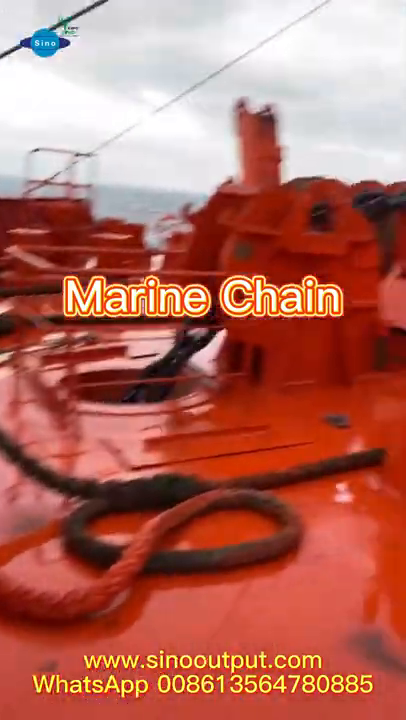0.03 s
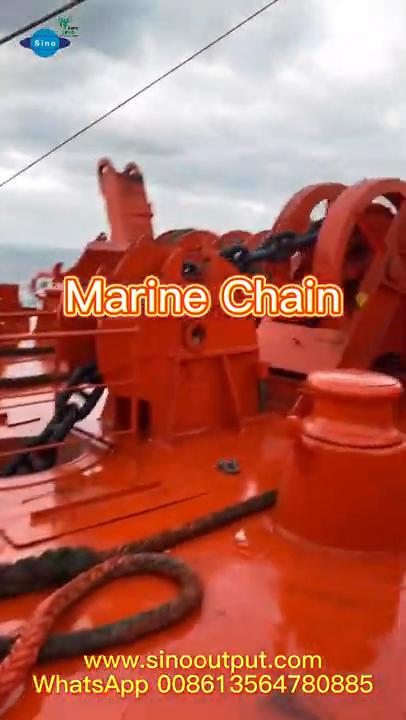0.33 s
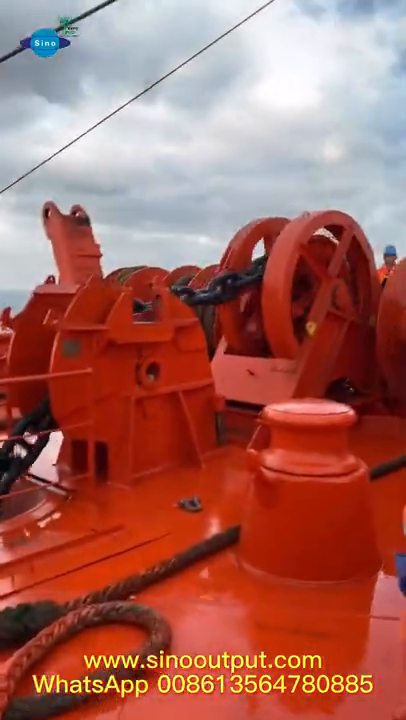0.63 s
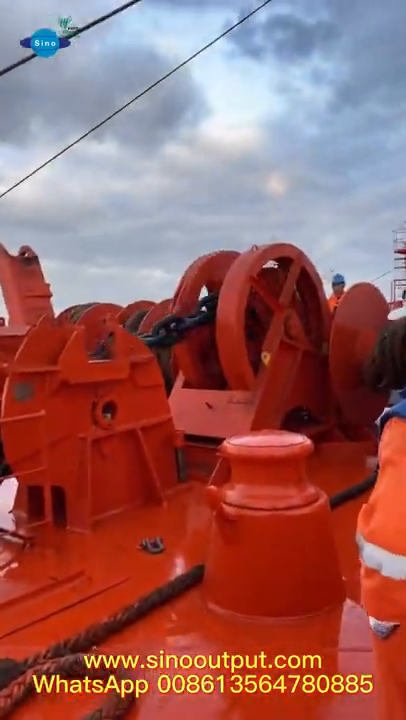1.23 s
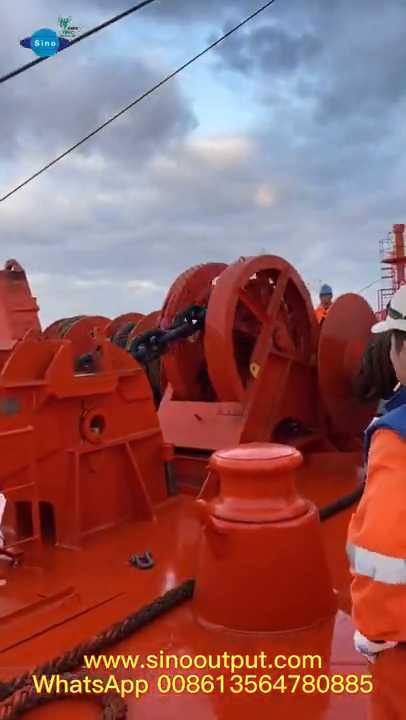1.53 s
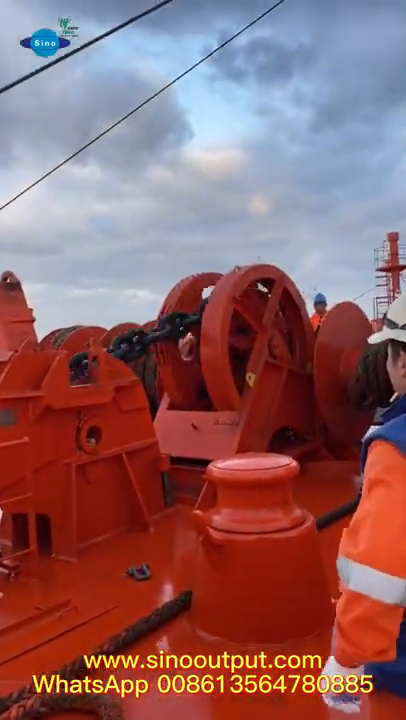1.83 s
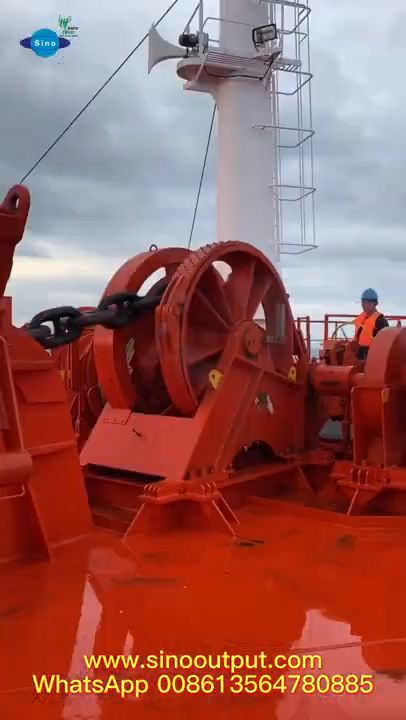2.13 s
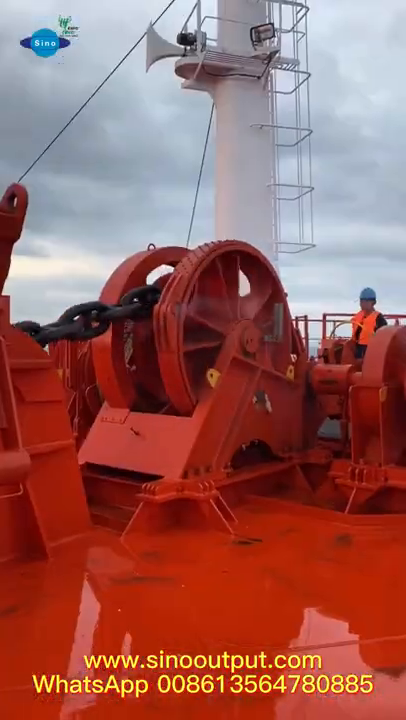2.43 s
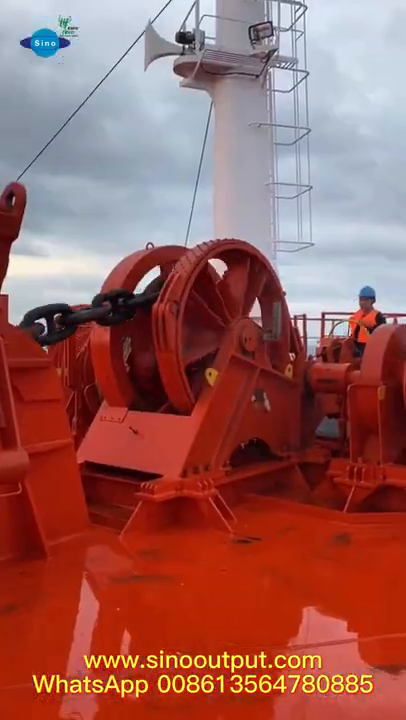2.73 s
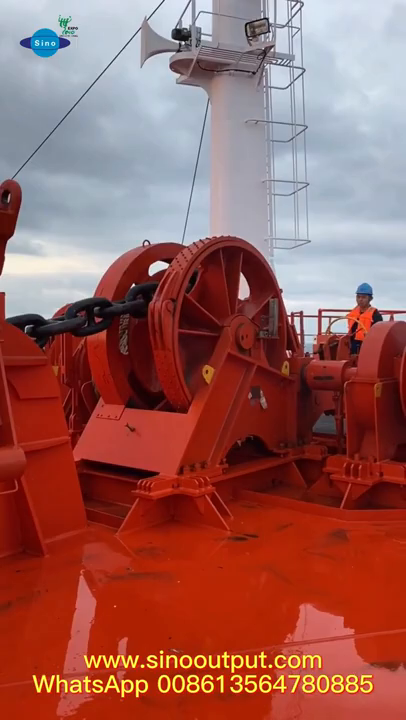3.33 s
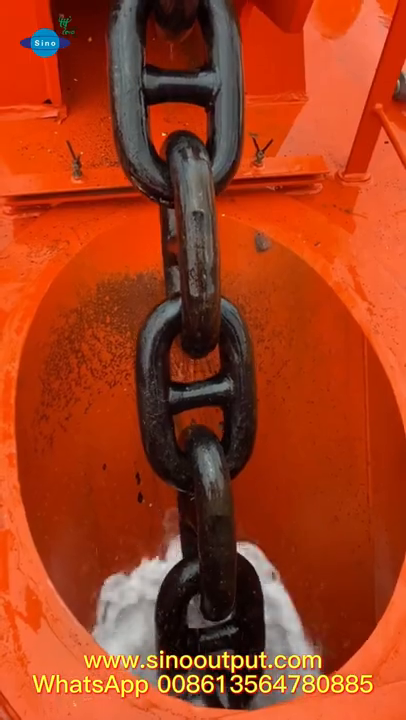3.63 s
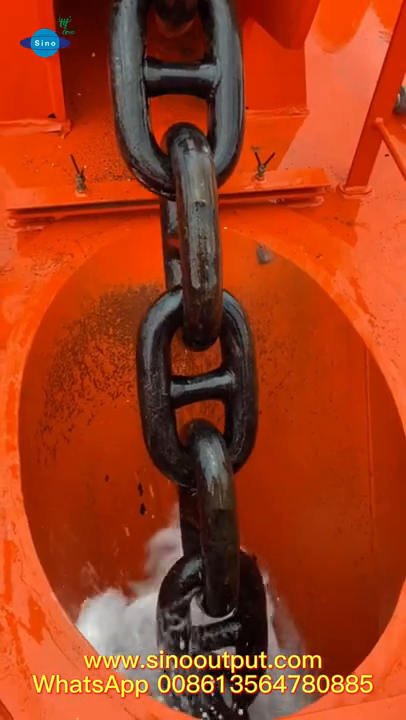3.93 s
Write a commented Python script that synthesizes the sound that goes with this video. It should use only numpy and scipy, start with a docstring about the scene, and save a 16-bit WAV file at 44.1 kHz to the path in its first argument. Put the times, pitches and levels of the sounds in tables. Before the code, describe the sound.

A heavy anchor chain clatters over a winch and slows, then water roars in a pipe.

```python
"""Anchor chain over a windlass

A stereo microphone at three places on a ship's deck, joined by short fades. Beside the chain, links
slam over the wheel about four times a second amid dense clatter and a booming steel deck. Facing the
wheel, the chain slows, wet links scrape and the slipping brake sings faintly. Over the hawse pipe,
wash water roars, sprays and splashes inside."""
import sys
import numpy as np
from scipy import signal
from scipy.fft import rfft, irfft, next_fast_len
from scipy.io import wavfile
from scipy.ndimage import map_coordinates

SR = 44100
rng = np.random.default_rng(int(sys.argv[2]) if len(sys.argv) > 2 else 0)


def store_wav(level_fs):
    """Save 16-bit WAV to argv[1]."""
    pcm = np.round(np.clip(np.atleast_2d(level_fs), -1, 1) * 32767)
    wavfile.write(sys.argv[1], SR, pcm.T.astype(np.int16))


N = 176400
T = np.arange(N) / SR

# the fast chain's clatter and the deck's boom (t/s, level/dB)
CLATTER_LEVELS = [(0, -17.5), (.12, -21.5), (.21, -19.5), (.29, -21), (.34, -18), (.44, -18.5), (.54, -23),
                  (.6, -17), (.65, -23.5), (.75, -20.5), (.81, -21), (.88, -17), (1.01, -19), (1.08, -22),
                  (1.16, -23.5), (1.27, -19), (1.33, -22), (1.37, -17.5), (1.44, -21), (1.53, -17.5),
                  (1.63, -20.5), (1.8, -21), (1.86, -23.5), (1.92, -20.5), (2.0, -21)]
BOOM_LEVELS = [(0, -19), (.3, -22.5), (.48, -19.5), (.62, -24), (.76, -18.5), (.86, -25), (1.02, -18),
               (1.14, -25.5), (1.3, -18.5), (1.38, -23), (1.56, -20.5), (1.66, -20), (1.8, -20), (2.0, -20)]
# links landing on the wheel (t/s, deck thud level/dB, thud f/Hz, clash level/dB)
LANDINGS = [(0.148, -7.5, 78, -20.5), (0.393, -12, 95, -17), (.682, -6.5, 91, -14), (0.96, -7.5, 87, -15.5),
            (1.224, -11, 100, -13.5), (1.478, -5, 101, -14), (1.726, -11, 90, -13), (1.987, -7, 98, -15.5),
            (2.333, -8.5, 120, -18.5), (2.794, -14, 291, -33)]
# links clanking together (t/s, level/dB, brightest f/Hz)
CLANKS = [(0.194, -33.5, 3130), (.322, -38, 3600), (0.394, -30, 1810), (.445, -42, 2300), (.495, -38, 2100),
          (0.756, -31.5, 1900), (.865, -44, 1900), (.965, -31, 1650), (1.228, -29.5, 2000),
          (1.374, -32.5, 2010), (1.535, -30.5, 2560), (1.724, -33, 2100), (2.229, -39.5, 2360),
          (2.326, -35.5, 1650), (2.405, -46, 2730), (2.535, -40, 2770), (2.77, -46, 2300),
          (3.044, -43, 2400)]
# wet links scraping, and link edges ticking (t/s, level/dB)
SCRAPES = [(.21, -41.5), (.38, -44), (.97, -42.5), (1.22, -41.5), (1.535, -50), (1.71, -53), (1.985, -43),
           (2.225, -54), (2.47, -43), (2.64, -46.5), (2.785, -53), (3.05, -56)]
TICKS = [(.375, -47), (.659, -45), (1.184, -54), (1.432, -43.5), (1.460, -49), (1.690, -39), (1.718, -39),
         (2.061, -39.5), (2.083, -51.5), (2.218, -49), (2.463, -38)]
# the chain slowing (t/s, rumble level/dB, clatter level/dB)
SLOWING_LEVELS = [(2.09, -20.5, -27), (2.13, -18, -24), (2.19, -22, -30.5), (2.235, -20.5, -23),
                  (2.29, -19.5, -29), (2.37, -18.5, -23.5), (2.42, -23, -30), (2.495, -23, -33.5),
                  (2.55, -22.5, -24), (2.66, -23, -25.5), (2.72, -21, -23.5), (2.815, -18, -27),
                  (2.9, -23, -32.5), (3.04, -23, -27), (3.15, -24, -35.5), (3.22, -30, -37.5),
                  (3.28, -31, -40.5), (3.315, -22, -34), (3.37, -27.5, -40)]
# the brake band's slip (t/s, squeal level/dB, main partial f/Hz)
BRAKE_SLIP = [(2.42, -25, 1398), (2.51, 2, 1415), (2.6, -1.5, 1381), (2.69, 5, 1388), (2.78, 1, 1390),
              (2.86, 5, 1343), (2.96, -1.5, 1387), (3.05, -2, 1370), (3.16, 4, 1378), (3.27, -0.5, 1360),
              (3.38, -2, 1400)]
# splashing builds in the pipe (t/s, level/dB)
SPLASH_LEVELS = [(3.45, -27), (3.7, -27), (3.8, -27.5), (3.95, -24.5)]
# spectra of the noisy sources (f/Hz, relative level/dB)
CLATTER_SPECTRUM = [(60, -36), (170, -8.5), (370, 0.5), (600, -1), (950, -6), (1400, -13), (2200, -18.5),
                    (2750, -26), (4000, -34), (5200, -37), (6500, -41.5), (11000, -53), (16000, -80)]
DECK_SPECTRUM = [(20, -35), (40, -13), (65, -2.5), (100, 2), (150, -6.5), (210, -7), (400, -20.5),
                 (1000, -58)]
CLASH_SPECTRUM = [(50, -27), (150, 10.5), (400, 0.5), (850, 2), (1400, -1.5), (2200, -18), (3000, -22.5),
                  (4200, -32.5), (6000, -38), (15000, -80)]
SCRAPE_SPECTRUM = [(800, -30), (3000, -5), (5200, 1.5), (7000, -8), (10500, -9.5), (16000, -10)]
TICK_SPECTRUM = [(2000, -23), (5000, -2), (7200, -1.5), (10000, -7.5), (12500, -8), (15500, -5)]
SLOW_RUMBLE_SPECTRUM = [(20, -40), (40, -13), (65, -0.5), (95, -1), (140, 2.5), (200, -1), (300, -3),
                        (420, -4.5), (600, -11.5), (1500, -63)]
SLOW_CLATTER_SPECTRUM = [(200, -11), (520, -1), (800, 1), (1300, -9.5), (1800, -15), (2600, -22.5),
                         (3700, -35), (5300, -38.5), (6600, -43.5), (11000, -51), (16000, -65)]
WATER_SPECTRUM = [(20, -33), (45, -13), (70, 3.5), (130, 1), (230, -0.5), (360, -1.5), (700, -4),
                  (1150, -2), (1600, -7.5), (2250, -6.5), (2800, -10), (4000, -14.5), (5300, -11.5),
                  (6200, -14), (7200, -18.5), (9000, -17), (11500, -19.5), (13300, -22), (15500, -20)]
# how deeply the steelwork ripples a spectrum (f/Hz, share of full depth)
RIPPLE_DEPTH = [(400, 0.21), (1500, 1), (4000, 0.8)]
# resonances of windlass frame, brake drum and hawse pipe (f/Hz, width/Hz, level/dB)
FRAME_MODES = [(145, 17, -31), (261.5, 25.6, -27.5), (364.6, 41, -31)]
DRUM_MODES = [(3360, 50, -73), (3810, 50, -70), (4500, 38, -73), (4960, 70, -82), (5766, 76, -74)]
PIPE_MODES = [(224.8, 18.6, -35.5), (607, 50, -37.5), (1120, 110, -38), (1836, 40, -45), (2930, 190, -47)]
# a link's modes and the squeal's partials (nominal f/Hz, relative level/dB)
LINK_MODES = [(928, -4), (1240, -2), (1640, 8.5), (1874, -0.5), (2150, 3), (2310, -9), (2720, 1.5),
              (2870, -1), (2965, -7), (3190, -5), (3310, -3), (3760, -13), (4010, -7), (5050, -9)]
BRAKE_PARTIALS = [(1205, -51), (1374, -42), (1475, -51), (2020, -60), (2865, -70.5)]
# stereo image at each microphone position, then the treble common to all three
# (f/Hz, coherence 0-1, left lead/rad, left minus right level/dB)
BESIDE_CHAIN = [(80, 1, -0.34, 0), (245, 0.85, -0.14, 0.3), (570, 0.54, -1.23, -1), (790, 0.37, 0.085, -2),
                (936, 0.57, -0.53, -6.5), (1240, 1, -1.2, -2), (2100, 1, -0.24, -1),
                (2820, 0.34, -0.49, -1.5), (5040, 0.54, .35, -1)]
FACING_WHEEL = [(80, 0.99, 0.12, 0.5), (353, 0.97, 0.13, -1.7), (580, 0.44, 0.76, 0.5),
                (690, 0.62, 0.013, 3), (1000, 0.52, 0.21, 2), (1430, 0.57, 0.8, 7.5),
                (1820, 0.3, 0.74, -0.5), (2660, 0.55, 1.7, 0.5), (4930, 0.39, .35, -1)]
OVER_PIPE = [(80, .995, 0.1, 0), (420, 0.94, -0.15, -1.2), (644, 0.54, -0.27, -1.5), (840, 0.61, 0.17, -3),
             (1150, 0.97, -0.79, -2.5), (1810, 1, 0.2, 0), (2200, 0.77, 0.24, 2), (2730, 0.13, 0.64, -2),
             (3570, 0.38, 0.99, -4), (5000, 0.61, 0.14, -0.5)]
MIC_TREBLE = [(5490, 1, 1.15, .3), (7470, 1, 3.2, 0), (9440, 1, 5.36, 0), (10900, 1, 6, 0),
              (12200, 0.5, 8.2, 0.025), (13700, 1, 9.4, 0), (16000, .3, 9.5, 0)]
# changes of microphone position (t/s, fade-out/s, fade-in/s)
MOVES = [(2.043, 0.059, 0.051), (3.42, 0.067, 0.053)]


def amp(db):
    """Decibels to gain."""
    return 10 ** (np.asarray(db) / 20)


def unit(x):
    """Scale to rms 1."""
    return x / np.sqrt(np.mean(x ** 2) + 1e-20)


def along(points, hz):
    """Interpolate (f/Hz, value) points on a log frequency axis."""
    freqs, values = np.transpose(points)
    return np.interp(np.log(hz + 1), np.log(freqs + 1), values)


def curves(rows):
    """One value per sample for each column after the time."""
    times, *columns = np.transpose(rows)
    return [np.interp(T, times, column) for column in columns]


def wobble(knots_per_s):
    """A smooth random curve."""
    return map_coordinates(rng.standard_normal(int(N * knots_per_s / SR) + 4), [T * knots_per_s])


def swell(peak_s, rise_s, fall_s):
    """An envelope with exponential rise and fall."""
    return np.exp(-np.maximum((peak_s - T) / rise_s, (T - peak_s) / fall_s))


def filtered(x, response):
    """Apply a gain given as a function of frequency."""
    size = next_fast_len(N + SR // 2)
    return irfft(rfft(x, size) * response(np.fft.rfftfreq(size, 1 / SR)), size)[..., :N]


def noise():
    """Two unrelated white noises."""
    return rng.standard_normal((2, N))


def coloured(pair, spectrum, ripple_db=3, spacing_hz=31.77):
    """Give a sound its spectrum, rippled by the many resonances of the steelwork; rms 1."""
    knots = rng.standard_normal(2000)

    def response(hz):
        ripple = np.interp(hz / spacing_hz, np.arange(len(knots)), knots) * along(RIPPLE_DEPTH, hz)
        return amp(along(spectrum, hz) + ripple_db * ripple)
    return unit(filtered(pair, response))


def ringing(modes):
    """Narrow resonances kept ringing by random shaking."""
    def response(f):
        return sum(amp(db) * np.sqrt(2 * SR / np.pi / width) / (1 + (2 * (f - hz) / width) ** 2)
                   for hz, width, db in modes)
    return filtered(noise(), response)


def impacts(per_s, t60_s, scatter_db, bodies=8):
    """Random hits on several bodies, each ringing with its own dense modes."""
    t = np.arange(SR // 3) / SR
    out = np.zeros((2, N))
    for _ in range(bodies):
        hits = (rng.random(N) < per_s / bodies / SR) * amp(scatter_db * rng.uniform(-0.65, 1, N))
        body = rng.standard_normal((2, len(t))) * amp(-60 * t / t60_s)
        out += signal.fftconvolve(hits[None], body, axes=1)[:, :N]
    return unit(out)


def rattle(grind_share=0.22):
    """Steel links knocking together over their steady grinding."""
    knocks = impacts(per_s=650, t60_s=0.082, scatter_db=7.5)
    return np.sqrt(1 - grind_share) * knocks + np.sqrt(grind_share) * noise()


def running_chain():
    """The fast chain clatters, and shakes the deck and the windlass frame."""
    clatter = amp(curves(CLATTER_LEVELS)[0]) * coloured(rattle(), CLATTER_SPECTRUM)
    boom = amp(curves(BOOM_LEVELS)[0]) * coloured(rattle(), DECK_SPECTRUM)
    frame = amp(2.3 * wobble(8.98)) * ringing(FRAME_MODES)
    return clatter + boom + frame


def link_landings(thud_spread=0.24, frame_db=-7):
    """Each link lands on the wheel with a clash, a knock of the frame and one low thud of the deck."""
    thuds = np.zeros((2, N))
    for (s, db, hz, _), phase in zip(LANDINGS, rng.random(len(LANDINGS))):
        angle = 2 * np.pi * (hz * (T - s) + phase)
        tone = np.array([np.sin(angle), thud_spread * np.cos(angle)])
        thuds += amp(db) * swell(s, rise_s=0.007, fall_s=0.017) * tone
    envelope = sum(amp(db) * swell(s, rise_s=0.031, fall_s=0.043) for s, _, _, db in LANDINGS)
    clash = coloured(rattle(), CLASH_SPECTRUM)
    frame = amp(frame_db) * unit(ringing(FRAME_MODES))
    return envelope * (clash + frame) + thuds


def clanks(chatter_share=0.31, octave_loss_db=26, scatter_db=5.5, detune=0.006):
    """Links strike, chatter and ring briefly; each contact favours the modes near its own pitch."""
    out = np.zeros((2, N))
    mode_hz, mode_db = np.transpose(LINK_MODES)[:, :, None]
    chatter = impacts(per_s=420, t60_s=0.02, scatter_db=12)
    for s, db, bright_hz in CLANKS:
        span = slice(int((s - 0.04) * SR), int((s + 0.3) * SR))
        t = T[span]
        focus = lambda f: amp(-octave_loss_db * np.log2((f + 1) / bright_hz) ** 2)
        strength, mistuning = rng.standard_normal((2, len(mode_hz), 1))
        steps = rng.standard_normal((2, len(mode_hz), SR // 2))[..., :len(t)]
        blur = 0.91 * np.cumsum(steps, axis=2) / np.sqrt(SR / 100)  # wandering phase widens each mode
        cycles = mode_hz * (1 + detune * mistuning) * t + rng.random((2, len(mode_hz), 1))
        gains = focus(mode_hz) * amp(mode_db + scatter_db * strength)
        ring = unit(np.sum(gains * np.sin(2 * np.pi * cycles + blur), axis=1))
        grit = unit(irfft(rfft(chatter[:, span]) * focus(np.fft.rfftfreq(len(t), 1 / SR)), len(t)))
        envelope = amp(db) * swell(s, rise_s=0.016, fall_s=0.043)[span]
        out[:, span] += envelope * (np.sqrt(1 - chatter_share) * ring + np.sqrt(chatter_share) * grit)
    return out


def scrapes():
    """Short gritty hisses of wet steel sliding on steel."""
    envelope = sum(amp(db) * swell(s, rise_s=0.0089, fall_s=0.029) for s, db in SCRAPES)
    return envelope * coloured(rattle(), SCRAPE_SPECTRUM)


def ticks():
    """Edges of links snap against the wheel."""
    envelope = sum(amp(db) * swell(s, rise_s=0.0005, fall_s=0.015) for s, db in TICKS)
    return envelope * coloured(noise(), TICK_SPECTRUM)


def slowing_chain():
    """As the chain slows, its clatter dies faster than its rumble."""
    rumble_db, clatter_db = curves(SLOWING_LEVELS)
    rumble = amp(rumble_db) * coloured(rattle(), SLOW_RUMBLE_SPECTRUM)
    clatter = amp(clatter_db) * coloured(rattle(), SLOW_CLATTER_SPECTRUM)
    return rumble + clatter


def brake_squeal(waver_hz=14.14, flutter_db=4):
    """The brake band slips and sings with an unsteady pitch; the drum's high modes grind along."""
    level_db, pitch_hz = curves(BRAKE_SLIP)
    main_hz = BRAKE_PARTIALS[1][0]
    squeal = np.zeros((2, N))
    for hz, db in BRAKE_PARTIALS:
        for channel in squeal:
            partial_hz = hz * pitch_hz / main_hz + waver_hz * wobble(110)
            angle = 2 * np.pi * np.cumsum(partial_hz) / SR
            channel += np.sqrt(2) * amp(db + flutter_db * wobble(38)) * np.sin(angle)
    drum = amp(1.8 * wobble(21.8)) * ringing(DRUM_MODES)
    return amp(level_db) * (squeal + drum)


def wash_water(growth_db_per_s=1):
    """Jets roar in the ringing hawse pipe while drops pelt its wall and splash."""
    jets = amp(-22.5) * coloured(noise(), WATER_SPECTRUM)
    spray = amp(-28) * coloured(impacts(per_s=600, t60_s=0.031, scatter_db=3), WATER_SPECTRUM)
    flow_db = growth_db_per_s * (T - T[-1]) + 0.22 * wobble(10)
    splashing = amp(curves(SPLASH_LEVELS)[0]) * splashes(start_s=MOVES[1][0])
    return amp(flow_db) * (jets + spray + splashing + ringing(PIPE_MODES))


def splashes(start_s, per_s=900, middle_hz=1984, spread_octaves=0.924, life_cycles=17.4, count=3000):
    """Drops and bursting bubbles: short rising blips of scattered pitch and size; rms 1 once begun."""
    t = np.arange(SR // 40) / SR
    out = np.zeros((2, N))
    for channel in out:
        onsets_s = start_s + np.cumsum(rng.exponential(size=(count, 1)), axis=0) / per_s
        hz = middle_hz * 2 ** (spread_octaves * rng.standard_normal((count, 1)))
        size_db = 3.5 * rng.uniform(-0.69, 1, (count, 1))
        cycles = np.minimum(hz, SR / 4) * t
        age = np.minimum(cycles / life_cycles, 2)
        glide = 1 + 0.06 * age
        blips = amp(size_db - 29 * age) * np.sin(2 * np.pi * cycles * glide)
        samples = (np.round(onsets_s * SR) + np.arange(len(t))).astype(int)
        channel += np.bincount(samples.ravel(), blips.ravel(), N)[:N]
    return out / np.std(out[:, T > start_s])


def microphone(pair, place):
    """Mix two unrelated versions of a sound into the left and right of one microphone position."""
    rows = np.array(place + MIC_TREBLE)
    coherence, lead_rad, balance_db = (rows[:, [0, k]] for k in (1, 2, 3))
    half = np.array([[0.5], [-0.5]])  # each side takes half of the phase and level offset

    def width(hz):
        angle = np.arccos(np.clip(along(coherence, hz), 0, 0.998)) / 2
        return np.array([np.cos(angle), np.sin(angle)])

    def direction(hz):
        return amp(half * along(balance_db, hz)) * np.exp(1j * half * along(lead_rad, hz))
    mid, side = filtered(pair, width)
    return filtered(np.array([mid + side, mid - side]), direction)


def scene():
    """Three microphone positions in turn, each fading out before the next fades in."""
    fade = lambda progress: np.clip(progress, 0.04, 1) ** 2 * (progress > 0)
    (to_wheel_s, chain_out_s, wheel_in_s), (to_pipe_s, wheel_out_s, pipe_in_s) = MOVES
    links = link_landings() + clanks() + scrapes() + ticks()
    at_chain = microphone(running_chain() + links, BESIDE_CHAIN)
    at_wheel = microphone(slowing_chain() + brake_squeal() + links, FACING_WHEEL)
    at_pipe = microphone(wash_water(), OVER_PIPE)
    return (fade((to_wheel_s - T) / chain_out_s) * at_chain
            + fade((T - to_wheel_s) / wheel_in_s) * fade((to_pipe_s - T) / wheel_out_s) * at_wheel
            + fade((T - to_pipe_s) / pipe_in_s) * at_pipe)


def record(dry, ceiling=0.95, top_hz=15750):
    """The recorder rounds the highest peaks and keeps nothing above its band limit."""
    rounded = dry / (1 + np.abs(dry / ceiling) ** 6) ** (1 / 6)
    return filtered(rounded, lambda hz: hz < top_hz)


dry = scene()
out = record(dry)
store_wav(out)
```